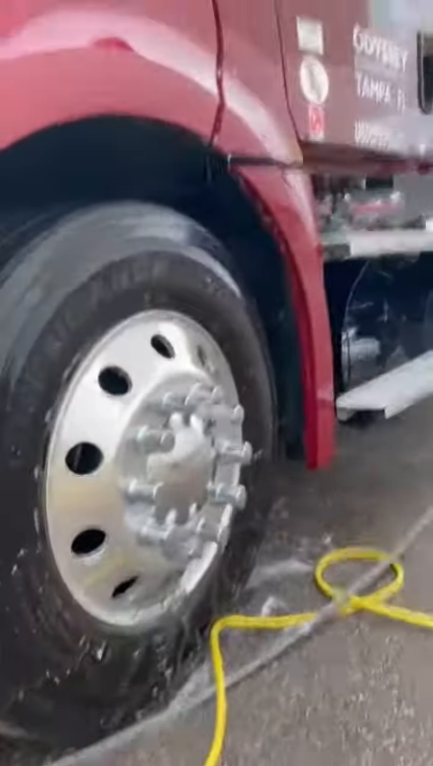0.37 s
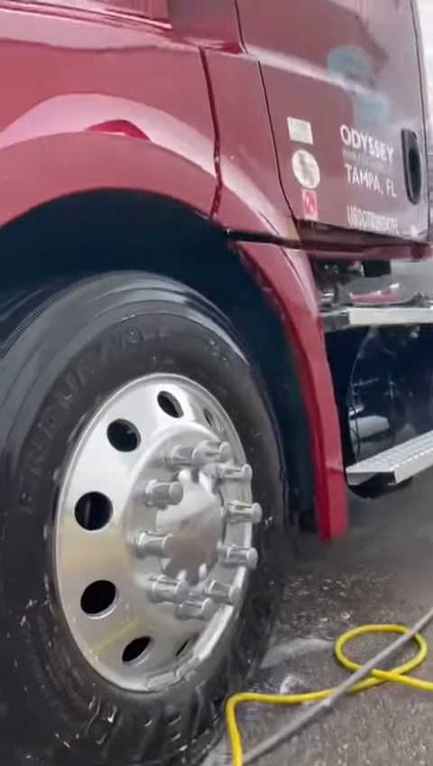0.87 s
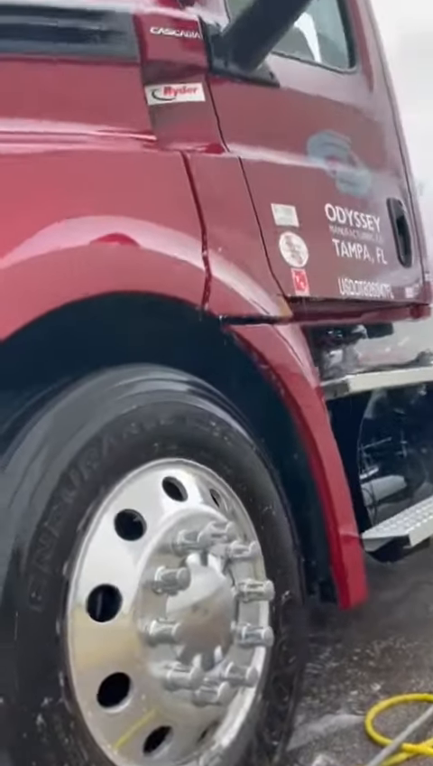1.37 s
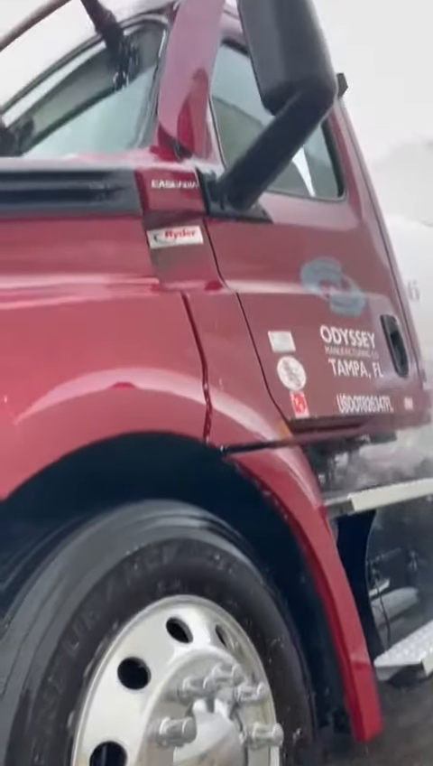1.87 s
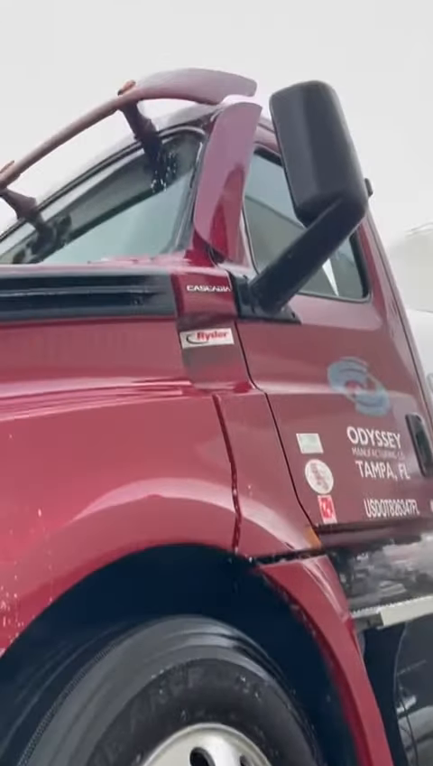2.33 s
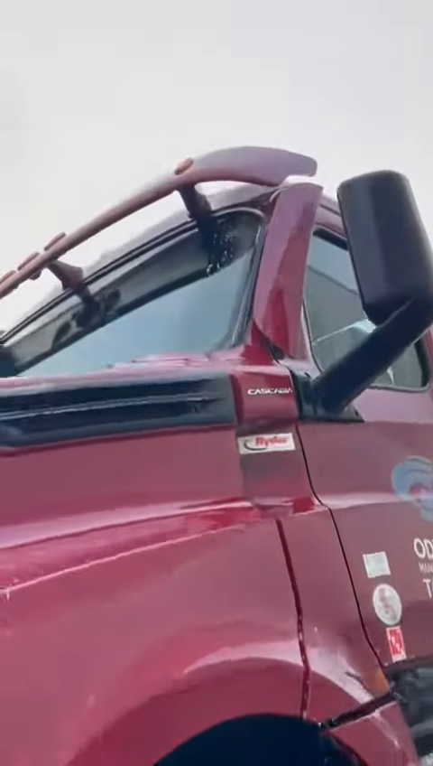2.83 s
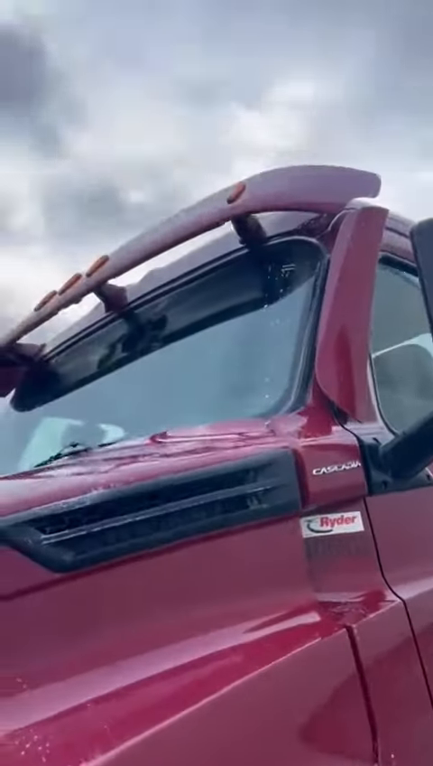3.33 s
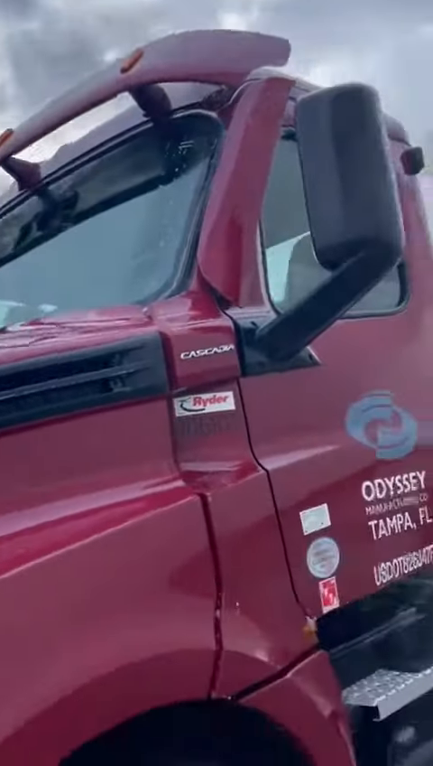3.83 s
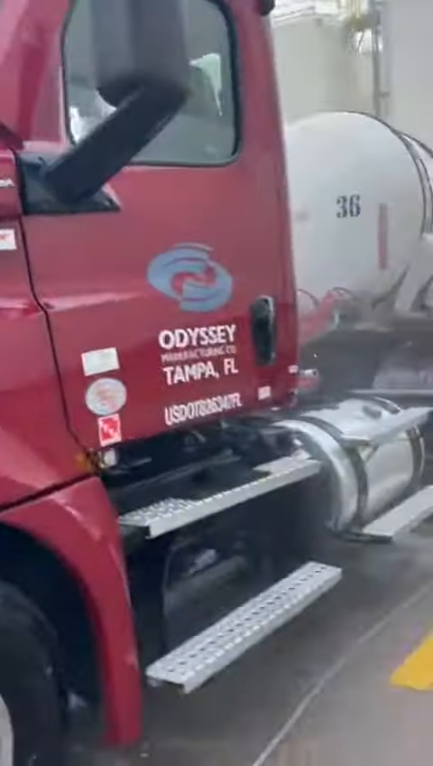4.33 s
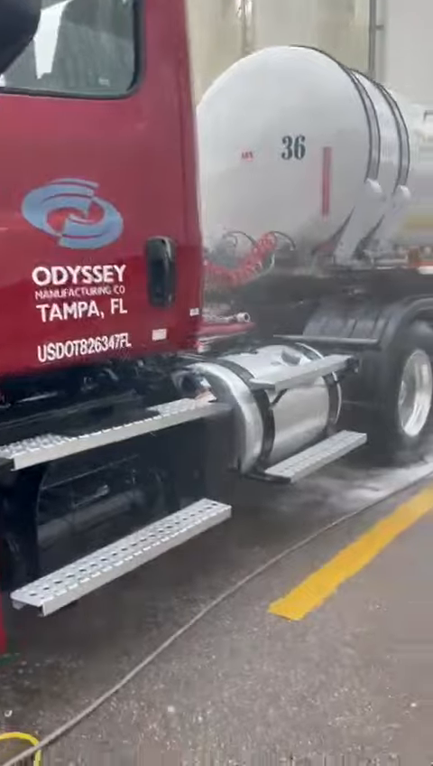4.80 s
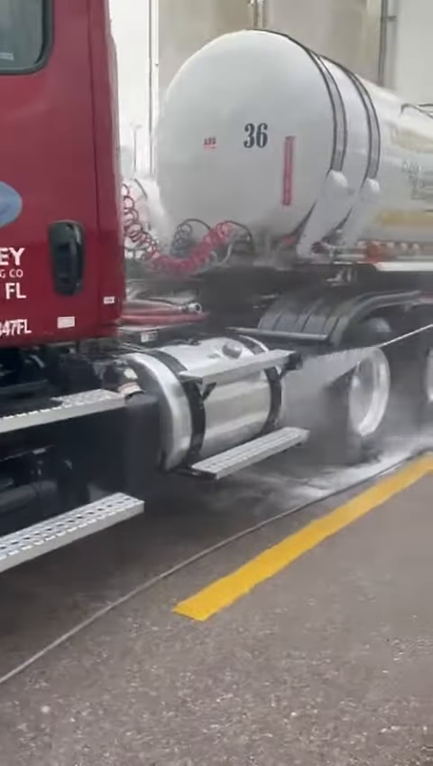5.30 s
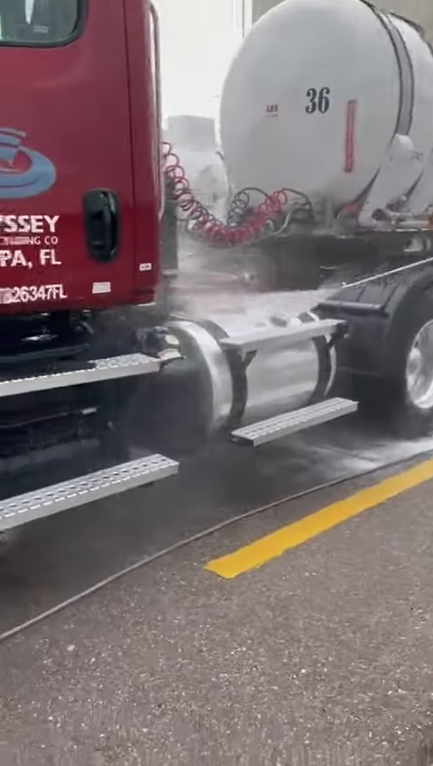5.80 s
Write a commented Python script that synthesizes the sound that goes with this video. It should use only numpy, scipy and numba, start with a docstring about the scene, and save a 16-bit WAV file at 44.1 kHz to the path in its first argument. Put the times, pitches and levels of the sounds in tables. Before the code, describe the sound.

A pressure washer jet plays over a large truck in an open paved yard, heard in stereo from a phone a few metres away. A wavering pump motor hums low throughout the first five seconds. The spray begins rather dull, then brightens after 0.6 s, swelling near 1 s. Hard, wet slaps ring metal edges at about 1.2, 1.7 and 1.95 s, while the roar in the hollows shifts in pitch. From about 3 to 3.7 s the hiss drops back and water drums in low, hollow pulses on a tank-like wall. More drumming follows at 4 and 4.4 s, with dull thuds at 4.6 and 4.75 s. A splash burst at 4.8 s brings the hiss up again; the motor's tones then sink away, leaving rumble. Slaps and thuds return around 5.2 to 5.4 s, and a bright, strong splash peaks near 5.6 s. Spray continues to the end with short, diffuse reflections.

```python
"""A paved yard with trucks around: a pressure washer's jet is swept over a tanker truck some metres from a phone.
Random water impacts, coloured band by band, hiss and splash; others drive resonances of the tank wall
and a moving band-pass for the roar in the hollows of the chassis. Noise bursts ring edges and dull thuds.
Sines on a wavering shaft rate and a noise rumble make the pump motor.
Two ports hear it all directly and off the trucks, through changing scatters of short echoes."""
import sys
import numpy as np
from scipy import signal
from scipy.fft import rfft, irfft, next_fast_len
from scipy.io import wavfile
from scipy.ndimage import uniform_filter1d, map_coordinates
from numba import njit

SR = 44100
rng = np.random.default_rng(int(sys.argv[2]) if len(sys.argv) > 2 else 0)


def gain_from_decibels(decibels):
    """Convert decibel values to linear amplitude factors."""
    exponent = np.asarray(decibels, float) / 20
    return 10 ** exponent


def log_audio(samples):
    """Write samples as a 16-bit WAV file to the path given in sys.argv[1]."""
    # one column per channel
    frames = np.atleast_2d(samples).T
    # limit to full scale, then quantise
    limited = np.clip(frames, -1, 1)
    pcm = np.round(limited * 32767).astype(np.int16)
    wavfile.write(sys.argv[1], SR, pcm)


N = 261450

# Jet breaking into mist. Each row: time in seconds, hiss in dB before a 3 dB lift, splash on metal in dB.
JET_LEVELS = [(0, -37, -35), (.6, -38.5, -35), (.66, -33.5, -34.5), (.84, -40, -33), (.97, -28.5, -30.5),
              (1.25, -32, -31), (1.63, -29.5, -30.5), (1.95, -29.5, -31), (2.89, -31.5, -31),
              (2.96, -37, -38.5), (3.33, -38, -37.5), (3.4, -36.5, -37.5), (3.7, -36.5, -35),
              (4.72, -33.5, -37.5), (4.83, -30, -32.5), (5.05, -33.5, -33.5), (5.14, -30, -31),
              (5.48, -31, -28), (5.66, -31, -26), (5.72, -31, -29.5), (5.83, -34, -30), (5.93, -31, -29.5)]
# Tilt of the hiss. Each row: time in seconds, slope in dB per octave about 4.5 kHz.
HISS_TILT = [(0, -7), (.7, 0), (2.9, 0), (3.4, 1), (3.7, -2.5), (4.75, -5), (5.4, -1), (5.93, -1.5)]
# Colour of the mist. Each row: frequency in Hz, relative density in dB per Hz.
HISS_COLOUR = [(2200, -10), (2900, -6), (3800, -5.5), (5200, 0), (6500, -1), (8000, -1.5), (9500, -1.5),
               (10800, -6.5), (11800, -41)]
# Colour of the splash. Each row: frequency in Hz, relative density in dB per Hz.
SPLASH_COLOUR = [(900, -4), (1300, 0), (1700, 0.5), (2200, -0.5), (2800, -7), (3600, -10.5)]
# The jet catches bare metal and splashes up.
# Each row: start in seconds, length in seconds, level in dB, change of level to the end in dB.
SPLASH_BURSTS = [(.635, .05, -33, 0), (3.74, .04, -34, 0), (4.815, .075, -27, -2), (5.59, .09, -24.5, 2),
                 (5.86, .07, -29, 2)]
# Spray arriving again off the wet ground.
# Each row: time in seconds, mean extra path in ms, share from 0 to 1 before it flickers.
GROUND_BOUNCE = [(0, 1.2, .2), (.6, 1.22, .15), (.87, 1.28, .3), (1., 1.13, .42), (1.14, .97, .4),
                 (1.24, .97, .08), (1.37, .93, .3), (1.5, .94, .2), (1.62, .96, .35), (1.75, 1.08, .2),
                 (1.9, 1.1, .3), (2.05, 1.15, .2), (2.37, 1.27, .27), (2.56, 1.5, .2), (2.9, .8, .25),
                 (3.05, .74, .05), (3.75, .7, .05), (3.9, .7, .25), (4.1, .72, .05), (4.7, 1., .05),
                 (4.85, 1.05, .25), (5, 1.2, .15), (5.1, 1.2, .03)]
# Hollow under the jet.
# Each row: time in seconds, roar in dB, resonance in Hz, resonance against the wash in dB.
HOLLOW_PATH = [(0, -31, 774, -3), (.4, -30.5, 700, 1.5), (.66, -26.5, 770, -2), (.98, -26, 805, -3),
               (1.12, -27.5, 1190, -1.5), (1.25, -22, 1090, -9), (1.45, -28.5, 980, -12),
               (1.68, -27, 845, -17), (2.05, -27, 470, -2.5), (2.3, -31, 800, 0), (2.8, -31.5, 900, 2.5),
               (2.95, -31.5, 570, -17), (3.85, -35, 617, -11), (4.3, -34, 497, 2), (4.56, -40, 500, 5),
               (4.62, -33.5, 510, 7.5), (4.7, -32, 514, 5.5), (4.76, -34.5, 553, 2.5),
               (4.86, -28.5, 1120, -8.5), (4.97, -33.5, 810, -4), (5.15, -30.5, 776, -6),
               (5.38, -27.5, 680, -3.5), (5.63, -24, 740, 0.5), (5.8, -29.5, 570, -5),
               (5.93, -25.5, 795, 0.5)]
# Colour of the wash in the hollow. Each row: frequency in Hz, relative density in dB per Hz.
WASH_COLOUR = [(300, -3.5), (420, 0), (600, 2), (850, -1.5), (1150, -5), (1500, -10), (1900, -18)]
# The jet passes over the tank wall. Each row: start in seconds, length in seconds, level in dB at 260 Hz,
# change of level to the end in dB, lean to the upper modes in dB per octave.
WALL_PASSES = [(0.476, 0.13, -39.5, -2, 5), (0.804, 0.067, -31, -1, -4), (1.612, 0.06, -36.5, 5, 3),
               (2.297, 0.11, -39, 2, -11), (2.675, 0.1, -37, 5, -5), (2.966, 0.024, -23.5, 0, -1),
               (3.065, 0.21, -22, -5.5, 4.5), (3.242, 0.13, -21, -3, 0.5), (3.421, 0.13, -22, 0, 2),
               (3.579, .19, -20, -4.5, -1), (4.023, 0.1, -24.5, -1, 0), (4.14, 0.061, -29, -1, -6),
               (4.4, 0.15, -23.5, -1, -1.5), (4.572, 0.2, -24, -2, -1.5), (4.763, 0.13, -28.5, 1.5, 5.5),
               (5.185, 0.083, -25.5, 0, 2), (5.384, 0.023, -24, -5, -9)]
# Stray water on the wall between passes. Each row: time in seconds, level in dB.
WALL_DRIZZLE = [(0, -35.5), (2.5, -39), (4.3, -37), (5.4, -34.5), (5.93, -49.5)]
# Modes of the tank wall. Each row: frequency in Hz, nominal width in Hz, relative level in dB.
TANK_MODES = [(165.5, 33, -6.5), (236, 60, 0.5), (310.5, 87, -4), (488, 170, -5.5), (544, 310, -12.5)]
# The jet slaps across an edge. Each row: time in seconds, peak in dB, brightness in dB per octave about 500 Hz,
# decay t60 of the spill in seconds, pitch of the edge as a ratio.
EDGE_SLAPS = [(0.647, -14.5, -3, 0.091, 1.2), (1.197, -5.5, -1.5, 0.35, 1.05), (1.726, -12, -1, 0.3, 1),
              (1.746, -13, -3, 0.2, 0.95), (1.953, -7, 0, 0.25, 1), (2.979, -19, -4, 0.13, 0.9),
              (5.176, -16, -2, 0.3, 1), (5.315, -7.5, 0.5, 0.05, 1.4), (5.672, -12, 5, 0.04, 1.4)]
# Modes of an edge at pitch ratio 1. Each row: frequency in Hz, nominal width in Hz, relative level in dB.
EDGE_MODES = [(130, 30, -22), (267, 220, -17), (470, 84, 7.5), (927, 120, 6), (1330, 380, -1.5),
              (1840, 610, -1.5)]
# Dull thuds in the chassis. Each row: time in seconds, peak in dB.
CHASSIS_THUDS = [(4.601, -20), (4.742, -21), (5.18, -18), (5.195, -21), (5.384, -17.5)]
# Modes of the thudding chassis. Each row: frequency in Hz, nominal width in Hz, relative level in dB.
CHASSIS_MODES = [(80, 67, 0), (149, 70, 4)]
# Pump motor, hidden at last as the phone turns.
# Each row: time in seconds, tones in dB before a 1.8 dB cut, rumble in dB before a 4 dB lift.
MOTOR_LEVELS = [(0, -32, -43), (1.2, -30.5, -41.5), (2.7, -34.5, -42.5), (4.75, -32.5, -44.5),
                (5.05, -43, -40), (5.93, -44.5, -42.5)]
# Tones of the motor. Each row: multiple of the shaft rate, relative level in dB before it wavers.
MOTOR_TONES = [(2, -7), (3, -15), (5, 0), (8, -8.5), (10, -24), (14, -13.5)]
# Colour of the motor's rumble. Each row: frequency in Hz, relative density in dB per Hz.
RUMBLE_COLOUR = [(25, -11), (35, -8), (45, 1), (65, 2.5), (100, 1.5), (150, 1.5), (250, -8.5)]
# Phase between the ports for direct sound. Each row: frequency in Hz, lead of the left port in radians.
PORT_LEAD = [(40, 0), (130, -.05), (250, -.3), (500, -.8), (950, -1), (1550, -.2), (2410, .2), (2750, .9),
             (3400, 1.2), (3960, .4), (5680, .8), (6980, 2.3), (7670, 2.95), (9040, 3.14), (12000, 3.14)]
# Balance of the ports for direct sound. Each row: frequency in Hz, left minus right in dB.
PORT_BALANCE = [(60, 0.0), (100, 0.0), (180, 0.5), (320, 2.5), (550, 3.5), (960, -1), (1680, -1.5),
                (2930, -1), (5110, 0.0), (8900, 0.0)]
# Echoes off the trucks. Each row: frequency in Hz, level against the mixed sources in dB.
ECHO_COLOUR = [(60, -26), (130, -43), (250, -16), (500, -9), (1000, -7.5), (2000, -7.5), (2700, -1),
               (3800, 1), (5000, -6.5), (7000, -3.5), (8500, -6.5), (12000, -33)]


def unit(x):
    """Scale to rms 1."""
    return x / np.sqrt(np.mean(x ** 2))


def curves(table):
    """Draw the columns of a timed table as lines, one value a sample."""
    seconds, *columns = np.transpose(table)
    return [np.interp(np.arange(N) / SR, seconds, column) for column in columns]


def along(table, hz):
    """Read a (Hz, value) table on a log-frequency axis."""
    table_hz, values = np.transpose(table)
    return np.interp(np.log(hz + 20), np.log(table_hz + 20), values)


@njit
def bandpass(x, hz, width):
    """State-variable band-pass with a moving centre, gain 1 there."""
    y, band, low = np.empty(len(x)), 0., 0.
    for i in range(len(x)):
        g, damping = np.tan(np.pi * hz[i] / SR), width / hz[i]
        v = (band + g * (x[i] - low)) / (1 + g * (g + damping))
        band, low, y[i] = 2 * v - band, low + 2 * g * v, damping * v
    return y


def walk(rate):
    """Wander at random: levels held for 1 / rate seconds, smoothed twice, scaled to rms 1."""
    hold = int(SR / rate)
    steps = np.repeat(rng.standard_normal(N // hold + 1), hold)
    return unit(uniform_filter1d(uniform_filter1d(steps, hold), hold)[:N])


def drops(rate, spread_db):
    """Random impacts of water, rate a second on average, a few much bigger than the rest."""
    hit = rng.random(N) < rate / SR
    return unit(hit * rng.standard_normal(N) * gain_from_decibels(spread_db * rng.exponential(size=N)))


def ring(x, modes):
    """A body rings in steep resonances of alternating sign."""
    out = 0
    for k, (hz, width, db) in enumerate(modes):
        centre = np.full(len(x), 1. * hz)
        # two passes make the skirts steep, so each is wider
        mode = bandpass(bandpass(x, centre, 1.82 * width), centre, 1.82 * width)
        out = out + (-1) ** k * gain_from_decibels(db) * mode / np.sqrt(width)
    return out


def spray(x, colour, flicker_db, rate, tilt_db=0):
    """Colour x in third-octave bands, tilted about 4.5 kHz; each band flickers alone."""
    hz, out = np.arange(N // 2 + 1) * SR / N, 0
    whole = rfft(x) * gain_from_decibels(along(colour, hz))
    step = np.log2(hz + 1) * 3  # third octaves above 1 Hz
    lowest, highest = int(3 * np.log2(colour[0][0])), int(3 * np.log2(colour[-1][0])) + 1
    for k in range(lowest, highest + 1):
        band = np.cos(np.pi / 2 * np.clip(step - k, -1, 1)) ** 2
        octaves = k / 3 - np.log2(4500)
        out = out + irfft(whole * band, N) * gain_from_decibels(flicker_db * walk(rate) + tilt_db * octaves)
    return unit(out)


def swells(rows, attack_s, t60):
    """Summed power of (start s, length s, dB, change dB) rows: each rises, holds or slides, then dies away."""
    t, power = np.arange(0, N / SR, .001), 0
    for start, length, db, change_db in rows:
        rise = np.clip((t - start) / attack_s + .5, 0, 1)
        slide_db = change_db * np.clip((t - start) / length, 0, 1)
        fall_db = -60 * np.maximum(t - start - length, 0) / t60
        power = power + (rise * gain_from_decibels(db + slide_db + fall_db)) ** 2
    return np.interp(np.arange(N) / SR, t, power)


def wet(hz):
    """Power of the passes as a mode at hz feels them, and of what lingers after the slaps."""
    passes = [(start, length, db + lean_db * np.log2(hz / 260), change_db)
              for start, length, db, change_db, lean_db in WALL_PASSES]
    # a slap that spills for 0.3 s lingers at full level
    lingers = [(s, 0.02, db + 20 * np.log10(t60 / .3), 0) for s, db, _, t60, _ in EDGE_SLAPS]
    return swells(passes, attack_s=0.032, t60=0.17), swells(lingers, attack_s=0.013, t60=0.76)


def jet():
    """Mist hisses as dense fine drops; the splash on metal is coarser and bursts on bare patches."""
    hiss_db, splash_db = curves(JET_LEVELS)
    surge_db = 1.1 * walk(9)
    hiss = spray(drops(20000, 1.5), HISS_COLOUR, flicker_db=1.0, rate=14, tilt_db=curves(HISS_TILT)[0])
    splash = spray(drops(6000, 0.92), SPLASH_COLOUR, flicker_db=1.5, rate=12)
    bursts = swells(SPLASH_BURSTS, attack_s=0.019, t60=0.03)
    splash_level = np.sqrt(gain_from_decibels(splash_db + surge_db) ** 2 + bursts)
    return gain_from_decibels(hiss_db + 3.0 + surge_db) * hiss + splash_level * splash


def hollow():
    """The gap the jet plays into roars at a pitch that follows its depth, over a broad wash."""
    roar_db, hz, share_db = curves(HOLLOW_PATH)
    passes, lingers = wet(500)
    push = drops(5000, 1.5)
    tuned = unit(bandpass(bandpass(push, hz, 380.0), hz, 380.0))
    upper = unit(bandpass(bandpass(push, 1.89 * hz, 330.0), 1.77 * hz, 300.))
    wash = spray(drops(5000, 1.43), WASH_COLOUR, flicker_db=2.2, rate=11)
    # the hollow roars along with each pass and after each slap
    pass_roar_db, slap_roar_db = -8, -19.5
    level = np.sqrt(gain_from_decibels(roar_db) ** 2 + gain_from_decibels(pass_roar_db) ** 2 * passes + gain_from_decibels(slap_roar_db) ** 2 * lingers)
    return level * unit(gain_from_decibels(share_db) * (tuned + gain_from_decibels(-13.0) * upper) + wash)


def ground(x):
    """The direct sound and its mirror in the paving comb each other as the lance moves."""
    lag_ms, share = curves(GROUND_BOUNCE)
    lag_ms = lag_ms * (1 + .025 * walk(14))  # the hand that holds the lance shakes
    share = share * gain_from_decibels(2.5 * walk(16))  # puddles and foam break the mirror
    bounce = map_coordinates(x, [np.arange(N) - lag_ms * SR / 1000], mode="mirror")
    return (x + share * bounce) / np.sqrt(1 + share ** 2)


def tank():
    """Uneven slugs of water beat the tank wall, each mode driven by slugs of its own."""
    patches, out = [ring(drops(1500, 0.95), [mode]) for mode in TANK_MODES], 0
    drizzle = gain_from_decibels(curves(WALL_DRIZZLE)[0]) ** 2
    slap_drum_db = -22
    for patch, mode in zip(patches, TANK_MODES):
        passes, lingers = wet(mode[0])
        out = out + patch * np.sqrt(drizzle + passes + gain_from_decibels(slap_drum_db) ** 2 * lingers)
    return out * gain_from_decibels(0.7 * walk(35)) / np.std(sum(patches))


def slaps():
    """A sharp burst of water and a weaker spill ring the edge; a bright slap favours the upper modes."""
    out, t = np.zeros(N), np.arange(SR // 4) / SR
    rise_s, burst_t60_s, spill_db = .005, .1, -9
    for s, db, bright_db, t60, pitch in EDGE_SLAPS:
        at = int((s - .002) * SR)  # the rise begins 2 ms ahead
        burst = 1000 ** (-t / min(t60, burst_t60_s))
        spill = gain_from_decibels(spill_db) * 1000 ** (-t / t60)
        push = rng.standard_normal(len(t)) * np.minimum(t / rise_s, 1) * (burst + spill)
        modes = [(hz * pitch, width, mode_db + bright_db * np.log2(hz / 500)) for hz, width, mode_db in EDGE_MODES]
        slap = ring(push, modes)
        out[at:at + len(t)] += gain_from_decibels(db) * slap / np.max(np.abs(slap))
    return out


def thuds():
    """Short dull blows of decaying noise ring low in the chassis."""
    out, t = np.zeros(N), np.arange(SR // 4) / SR
    blow_t60_s = 0.06
    for s, db in CHASSIS_THUDS:
        at = int(s * SR)
        blow = ring(rng.standard_normal(len(t)) * 1000 ** (-t / blow_t60_s), CHASSIS_MODES)
        out[at:at + len(t)] += gain_from_decibels(db) * blow / np.max(np.abs(blow))
    return out


def motor():
    """Tones at multiples of the shaft rate waver a little in pitch and level, over a noise rumble."""
    tone_db, rumble_db = curves(MOTOR_LEVELS)
    shaft_hz = 23.73 * (1 + 0.0042 * walk(2.88))
    turn = 2 * np.pi * np.cumsum(shaft_hz) / SR
    tones = 0
    for multiple, db in MOTOR_TONES:
        tone = np.sin(multiple * turn + 2 * np.pi * rng.random())
        tones = tones + gain_from_decibels(db + 1.3 * walk(9)) * tone
    rumble = spray(rng.standard_normal(N), RUMBLE_COLOUR, flicker_db=1.0, rate=11.0)
    return np.sqrt(2) * gain_from_decibels(tone_db - 1.8) * tones + gain_from_decibels(rumble_db + 4.0) * rumble


def echoes(sources, size, hz):
    """Spectra of the scatter off the trucks: short noise tails, a separate one for each port."""
    t, out = np.arange(SR // 2) / SR, 0
    sets, rise_s, yard_t60_s = 36, 0.015, 0.034
    # jet and phone both move, so each set of echo paths fades into the next
    turn = np.arange(N) * (sets - 1) / N
    for k in range(sets):
        tails = rng.standard_normal((2, len(t))) * np.minimum(t / rise_s, 1) * 1000 ** (-t / yard_t60_s)
        paths = rfft(tails / np.sqrt(np.sum(tails ** 2, axis=1, keepdims=True)), size)
        share = np.cos(np.pi / 2 * np.clip(turn - k, -1, 1))
        out = out + rfft(sources * share, size) * paths * gain_from_decibels(along(ECHO_COLOUR, hz))
    return out


def scene():
    """Each port hears the sources with its own phase and level, plus its own scatter of echoes."""
    size = next_fast_len(N + SR)
    hz = np.arange(size // 2 + 1) * SR / size
    sources = ground(jet() + hollow()) + tank() + slaps() + thuds() + motor()
    # half of each difference goes to either port
    lean = gain_from_decibels(along(PORT_BALANCE, hz) / 2) * np.exp(.5j * along(PORT_LEAD, hz))
    direct = rfft(sources, size) * np.array([lean, 1 / lean])
    return irfft(direct + echoes(sources, size, hz), size)[:, :N]


def roll_off(x):
    """The treble ends steeply here."""
    return signal.sosfilt(signal.butter(12, 11500, fs=SR, output="sos"), x)


def record(dry):
    """The phone keeps the bass in the middle: the side signal is thinned gently below 260 Hz."""
    mid, side = (dry[0] + dry[1]) / 2, (dry[0] - dry[1]) / 2
    side = signal.sosfiltfilt(signal.butter(1, 260, "high", fs=SR, output="sos"), side)
    return roll_off(np.array([mid + side, mid - side]))


dry = scene()
out = record(dry)
log_audio(out)
```